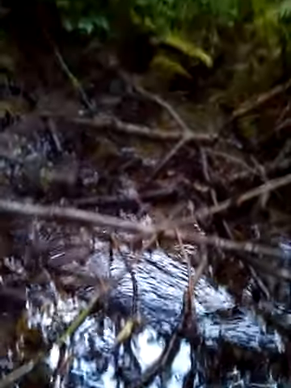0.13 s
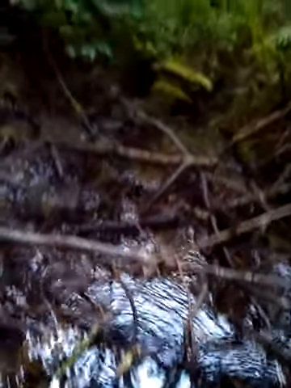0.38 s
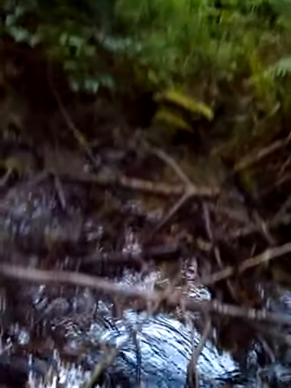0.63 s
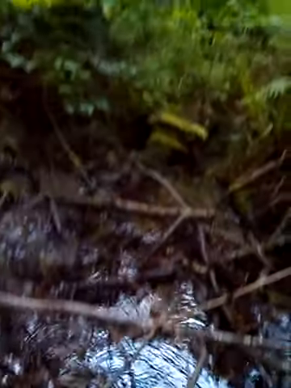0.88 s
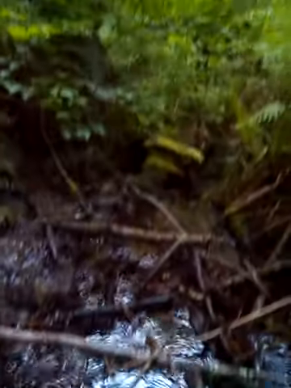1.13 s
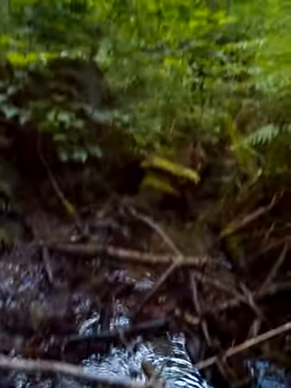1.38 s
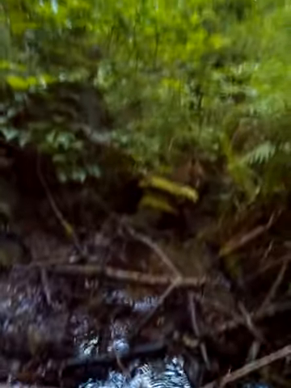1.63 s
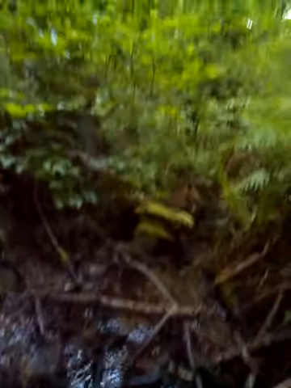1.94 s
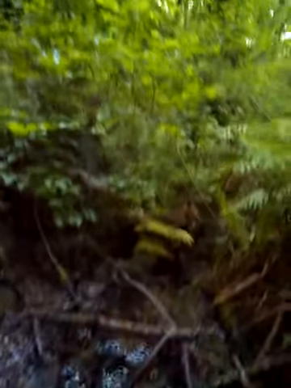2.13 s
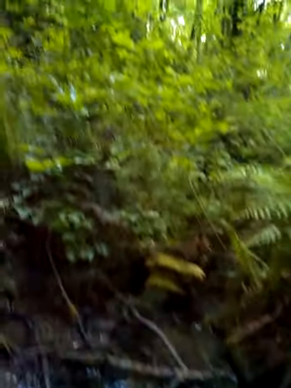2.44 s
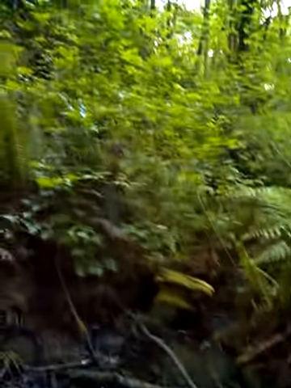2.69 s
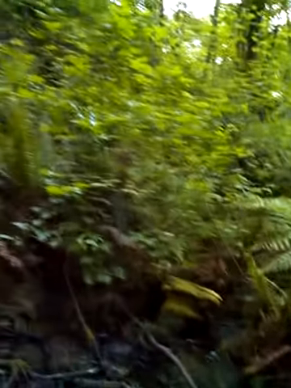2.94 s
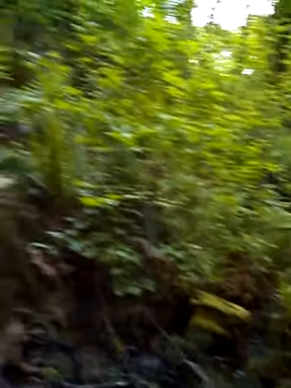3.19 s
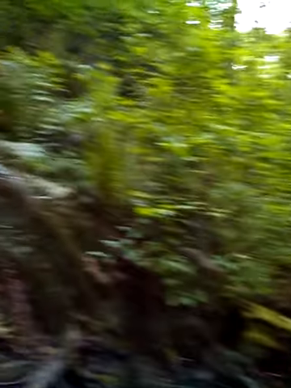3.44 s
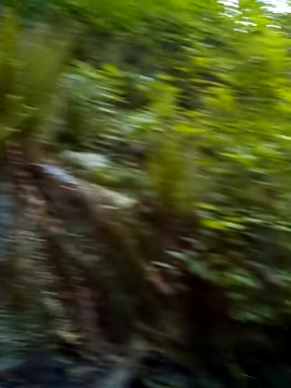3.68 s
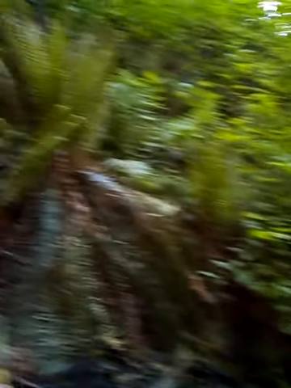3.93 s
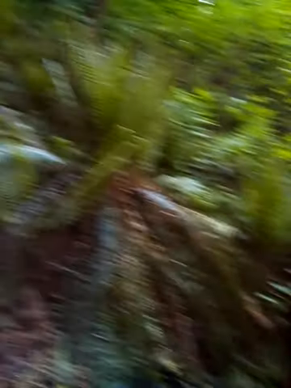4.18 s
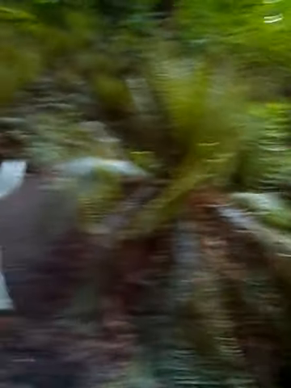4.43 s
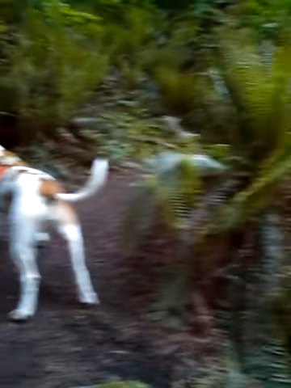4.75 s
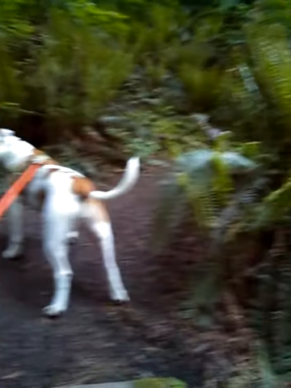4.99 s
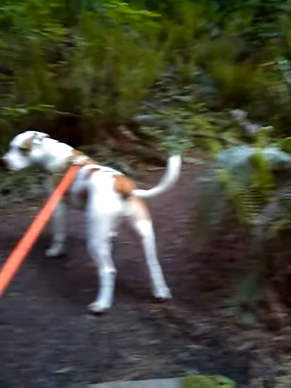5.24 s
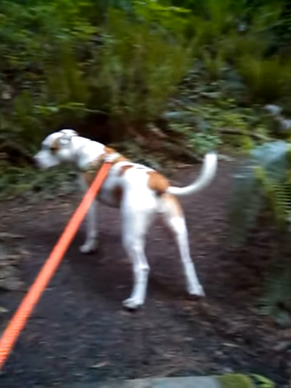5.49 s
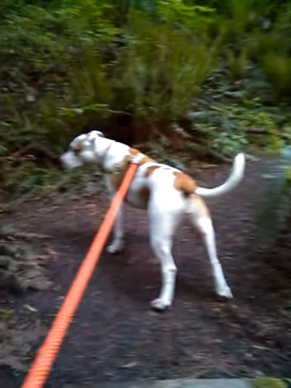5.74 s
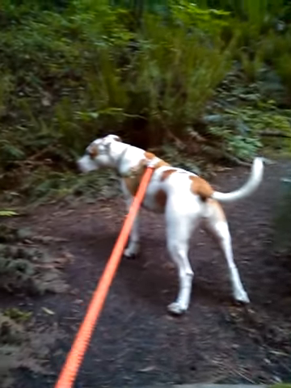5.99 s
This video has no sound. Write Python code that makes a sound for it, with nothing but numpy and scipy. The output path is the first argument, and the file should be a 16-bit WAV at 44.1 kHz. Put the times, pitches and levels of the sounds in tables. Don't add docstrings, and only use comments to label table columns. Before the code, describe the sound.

A small creek trickles brightly over stones with drops, bubbles and glugs, a heel knocks once on a wooden plank, then the water fades.

```python
import sys
import numpy as np
from scipy import signal
from scipy.io import wavfile
from scipy.ndimage import uniform_filter1d

SR = 44100
rng = np.random.default_rng(int(sys.argv[2]) if len(sys.argv) > 2 else 0)


def level_to_linear(level):
    exponent = np.asarray(level, float) / 20
    return 10 ** exponent


def master(y):
    cut = np.clip(np.atleast_2d(y).T, -1, 1)
    pcm = np.round(cut * 32767)
    wavfile.write(sys.argv[1], SR, pcm.astype(np.int16))


N = 269892

# time in seconds, level in dB, lead of the right capsule in samples.
NEARNESS = [
    (0.0, -43.5, 4),
    (0.85, -43.5, 4.9),
    (1.81, -43.5, 4.9),
    (2.25, -42.5, 1.7),
    (2.98, -43, 6.3),
    (3.54, -45, 5.7),
    (4.29, -47, 8.4),
    (5.25, -50.5, 2.9),
    (6.12, -55.5, 6.4),
]
# frequency in Hz, level in dB per Hz when the creek is close.
FIZZ_SPECTRUM = [(1500, -93.5), (2500, -79.5), (4000, -81), (6000, -81.5), (7600, -83), (9000, -89.5),
                 (10300, -100), (13500, -94), (16000, -99)]
# frequency in Hz, level in dB per Hz when the creek is close.
GURGLE_SPECTRUM = [(150, -75.5), (300, -79.5), (480, -70), (700, -81.5), (1000, -84), (1500, -79.5),
                   (2200, -83), (4000, -102.5)]
# frequency in Hz, level in dB per Hz.
FOREST_SPECTRUM = [(30, -57.5), (60, -77), (90, -71), (170, -73), (350, -75), (700, -82.5), (1500, -81.5),
                   (4000, -91.5), (9000, -104), (11000, -114)]
# frequency in Hz, change in dB.
CASE_SHADE = [(300, -2), (1200, -9), (2200, -3.5), (3400, -11), (6500, -5), (9000, -8.5), (14000, -15)]
# frequency in Hz, likeness from 0 to 1.
LIKENESS = [(90, 0.74), (170, 0.6), (450, 0.98), (1000, 0.74), (1800, 0.042), (4000, 0.033), (10000, 0.037)]
# start in seconds, peak in dB, pitch in Hz.
CLEAR_DROPS = [(0.0158, -29, 3780), (0.0303, -27.5, 4200), (0.1232, -28, 3660), (0.2429, -24, 3960),
               (0.3188, -27, 4580), (0.3246, -29, 3950), (0.5005, -34, 3400), (0.6732, -35, 4200),
               (0.7668, -26, 4250), (0.6852, -32, 4310), (0.7433, -28.5, 3720), (0.9236, -26, 4650),
               (0.994, -25.5, 4100), (1.3125, -30, 4390), (1.3847, -27.5, 4000), (1.4591, -28, 4220),
               (1.8128, -25.5, 4200), (1.8212, -26, 4340), (1.9442, -20.5, 5000), (2.1314, -25.5, 4240),
               (2.352, -32, 3920), (2.5225, -25.5, 5050), (2.5863, -26.5, 4250), (2.7311, -26, 3900),
               (3.029, -26.5, 4030), (3.0689, -25.5, 4030), (3.1534, -23, 4030), (2.857, -25, 4000),
               (3.8112, -30, 4070), (4.215, -34, 4000)]
# start in
# seconds, peak in dB, pitch in Hz.
SINGLE_BUBBLES = [(0.1068, -30, 2320), (0.1358, -32, 1880), (0.1591, -32, 1570), (0.3376, -29, 1015),
                  (0.3477, -29, 1480), (0.3753, -33.5, 1210), (0.5175, -32.5, 1360), (0.5857, -36, 1315),
                  (0.7715, -35, 1460), (0.9703, -35, 1330), (1.2185, -35, 1880), (1.3259, -33.5, 1315),
                  (1.9731, -30, 2200), (2.0457, -33, 1390), (2.1603, -35, 1480), (2.3577, -39, 1010),
                  (2.6523, -30, 2280), (2.7365, -31.5, 996), (2.7423, -30, 1610), (2.7815, -33, 900),
                  (2.9846, -31, 2230), (3.1167, -35, 1020), (3.7451, -36, 1210), (4.18, -38, 980),
                  (5.0425, -35.5, 1390), (1.0821, -35, 2550), (1.8277, -33, 2600), (2.3719, -28, 2570),
                  (3.2721, -38, 2650)]
# start in seconds, peak in dB, pitch in Hz.
HOLLOW_GLUGS = [(0.052, -34.5, 526), (0.329, -33, 466), (0.405, -28.5, 396), (0.451, -34, 433),
                (0.487, -32.5, 457), (0.519, -32.5, 603), (0.609, -34, 413), (0.662, -33.5, 460),
                (0.859, -35.5, 394), (1.415, -35, 425), (1.602, -29.5, 488), (1.638, -33, 510),
                (1.751, -32, 400), (1.954, -36, 540), (2.431, -34.5, 387), (2.638, -35.5, 500),
                (2.719, -29, 507), (2.76, -37, 443), (3.096, -34.5, 534), (3.355, -33, 405),
                (3.64, -31.5, 470), (3.69, -31.5, 494), (3.97, -30, 500), (4.526, -36, 500),
                (4.684, -32, 503), (4.821, -38, 383), (5.455, -37, 475), (5.836, -36, 596)]
# start in seconds, peak in dB.
SPRAY_TICKS = [(0.0293, -32), (0.2039, -38), (0.2473, -29), (0.2783, -40), (0.3571, -32), (0.4254, -34),
               (0.5126, -34), (0.6025, -29), (0.6784, -33), (0.7654, -29), (0.9058, -33), (0.9243, -31),
               (1.041, -26), (1.2121, -28), (1.313, -29), (1.4112, -36), (1.5918, -36), (1.6207, -30),
               (1.6995, -29.5), (1.9415, -25.5), (1.978, -28), (2.0313, -26.5), (2.0905, -33),
               (2.2972, -40), (2.9976, -30), (3.0886, -27)]
# start in seconds, splash peak in dB, drop peak in dB, drop pitch in Hz.
STONE_SPLASHES = [(0.247, -20, -25.5, 3830), (0.6627, -24.5, -20.5, 4400), (1.075, -26, -23.5, 4200),
                  (1.6006, -27, -28, 6200), (2.653, -38, -28, 5560), (2.9994, -32, -25, 5600),
                  (3.0897, -26, -30, 4240), (3.1028, -33, -39, 7100), (3.3477, -30, -28.5, 4330),
                  (3.737, -30, -25.5, 4330), (4.485, -29, -28, 4690), (4.682, -32, -46, 5870),
                  (4.795, -38, -27, 4030)]
# start in seconds, peak in dB, upper mode gain in dB, thud in dB, free ringing in seconds.
HEEL_BLOWS = [(1.8938, -14, 1, -7, 0.0137), (1.912, -22.5, 9.5, -13, 0.0027),
              (1.9201, -17, -13, -8.5, 0.0043), (1.9272, -27.5, 4, 5, 0.0076), (1.933, -33, 16, 0, 0.007),
              (1.944, -33, 13, -12, 0.0071), (1.954, -29, -3, -7, 0.013), (1.968, -35, 4, -4, 0.0092),
              (1.983, -47, 4, -6, 0.016), (2.001, -37, 4, -19, .015), (3.691, -35, -14, 12, 0.0088)]
# frequency in Hz, level in dB, time to fall 60 dB in seconds.
BOARD_MODES = [(460, -2.5, 0.053), (688, -7, 0.022), (1035, -9.5, 0.019), (1210, -19, 0.056),
               (2800, -29, 0.027)]
# frequency in Hz, level in dB.
HIDDEN_BELOW = [(700, -24), (1400, -16), (3000, -14), (8000, -14.5), (9300, -5.5), (16000, -3)]


def evened(x):
    return x / np.sqrt(np.mean(x ** 2) + 1e-20)


def read(points, hz):
    point_hz, value = np.transpose(points)
    return np.interp(np.log(hz + 1), np.log(point_hz + 1), value)


def fizz_level(t):
    s, db, _ = np.transpose(NEARNESS)
    return np.interp(t, s, db)


def gurgle_level(t):
    return 0.63 * fizz_level(t) - 16.5


def right_lead(t):
    s, _, lead = np.transpose(NEARNESS)
    return np.interp(t, s, lead)


def add(mix, s, sound, shade_db, lead):
    left_at = round(s * SR)
    right_at = max(round(s * SR - lead), 0)
    for side, at, db in ((0, left_at, 0.1), (1, right_at, shade_db)):
        part = mix[side, at:][:len(sound)]
        part += level_to_linear(db) * sound[:len(part)]


def ring(hz, t60, rise, cycles):
    t60 = np.clip(t60, 0.002, 0.3)
    t = np.arange(0, t60, 1 / SR)
    tone = np.sin(2 * np.pi * hz * (t + rise * t ** 2 / t60))
    start = 1 - np.exp(-t * hz / cycles)
    return tone * level_to_linear(-60 * t / t60) * start


def wash():
    frames, hop = N // 128 + 5, 128
    hz = np.fft.rfftfreq(512, 1 / SR)[:, None]
    t = np.arange(frames) * hop / SR
    a, b, c, d, patches = rng.standard_normal((frames, 257, 5)).T
    patches = uniform_filter1d(patches, size=7, axis=0)
    patches = evened(uniform_filter1d(patches, size=9, axis=1))
    flicker = evened(uniform_filter1d(rng.standard_normal(frames), size=7))
    fizz = level_to_linear(read(FIZZ_SPECTRUM, hz) + fizz_level(t) + 43.5 + 2.0 * patches + 1.76 * flicker)
    gurgle = level_to_linear(read(GURGLE_SPECTRUM, hz) + gurgle_level(t) + 43.5 + 4.26 * patches + 0.46 * flicker)
    hum = level_to_linear(read(FOREST_SPECTRUM, hz))
    size = np.sqrt(fizz ** 2 + gurgle ** 2 + hum ** 2)

    left, other = a + 1j * b, c + 1j * d
    same = np.clip(read(LIKENESS, hz), 0, 1)
    early = np.exp(2j * np.pi * hz * right_lead(t) / SR)
    right = same * left * early + np.sqrt(1 - same ** 2) * other
    right = right * level_to_linear(read(CASE_SHADE, hz))
    plain = signal.istft(left, nperseg=512, noverlap=384)[1]
    unit = np.sqrt(np.mean(plain ** 2) * 2 / SR)
    both = signal.istft(np.array([left, right]) * size, nperseg=512, noverlap=384)[1]
    return both[:, :N] / unit


def swarm(count, low_hz, high_hz, cycles, per_s, spread_db, db, level):
    out = np.zeros((2, N + SR))
    bursts = int(per_s / count * N / SR)
    for hz in np.geomspace(low_hz, high_hz, count):
        when, chance = rng.random((bursts, 2)).T
        size = level_to_linear(spread_db * np.minimum(-np.log(chance + 1e-9), 4))
        pop = ring(hz, cycles / hz, 0.092, 0.9)
        at = (when * N).astype(int)[:, None] + np.arange(len(pop))
        pops = np.bincount(at.ravel(), np.outer(size, pop).ravel(), N + SR)
        out[0] += pops
        out[1] += level_to_linear(read(CASE_SHADE, hz)) * np.roll(pops, -rng.integers(0, 14))
    return evened(out[:, :N]) * level_to_linear(db + level(np.arange(N) / SR))


def ringing_air(rows, gain_db, t60_at_1khz, rise, cycles):
    out = np.zeros((2, N))
    for s, peak_db, hz in rows:
        tone = ring(hz, t60_at_1khz * (1000 / hz) ** 0.61, rise, cycles)
        add(out, s, level_to_linear(peak_db + gain_db) * tone, read(CASE_SHADE, hz), right_lead(s))
    return out


def drops():
    after_splash = [(s + 0.0008, db, hz) for s, _, db, hz in STONE_SPLASHES]
    return ringing_air(list(CLEAR_DROPS) + after_splash, 7.6, t60_at_1khz=0.021, rise=0.033, cycles=1.05)


def bubbles():
    return ringing_air(SINGLE_BUBBLES, 3.8, t60_at_1khz=0.042, rise=0.21, cycles=1.2)


def glugs():
    return ringing_air(HOLLOW_GLUGS, 2.1, t60_at_1khz=0.036, rise=0.032, cycles=0.35)


def spray_ticks():
    out = np.zeros((2, N))
    t = np.arange(800) / SR
    start = 1 - np.exp(-t / 0.00037)
    for s, peak_db in SPRAY_TICKS:
        bright = np.diff(rng.standard_normal(802), 2)
        add(out, s, level_to_linear(peak_db - 14.0 - 60 * t / 0.02) * start * bright, -3, right_lead(s))
    return out


def stone_splashes():
    out = np.zeros((2, N))
    fade = level_to_linear(-60 * np.arange(800) / SR / 0.013)
    band = signal.butter(3, [2600, 7300], "band", fs=SR)
    for s, peak_db, *_ in STONE_SPLASHES:
        burst = signal.lfilter(*band, rng.standard_normal(800) * fade)
        add(out, s, level_to_linear(peak_db + 6.0) * burst, -6.5, right_lead(s))
    return out


def plank_knocks():
    out = np.zeros((2, N))
    for s, peak_db, upper_db, thud_db, free_s in HEEL_BLOWS:
        for hz, db, t60 in BOARD_MODES:
            mode = ring(hz, 1.04 * t60, 0, 0.59)
            sole_db = -4500 * np.maximum(np.arange(len(mode)) / SR - free_s, 0)
            mode_db = peak_db + db + upper_db * (900 < hz < 2000)
            add(out, s, level_to_linear(mode_db + sole_db) * mode, 0.3, 7)
        thud = ring(245, 0.013, 0, 0.33)
        add(out, s, level_to_linear(peak_db + thud_db + 6.0) * thud, 0.3, 7)
    return out


def plank_shiver():
    out = np.zeros((2, N))
    t60, taps_per_s = 0.93, 500
    t = np.arange(0, t60, 1 / SR)
    hit = rng.random(len(t)) < taps_per_s / SR
    chatter = rng.standard_normal(len(t)) * hit * level_to_linear(-27 - 60 * t / t60)
    for hz in (800, 1250, 1600):
        flipped = chatter * rng.choice([-1, 1], len(t))
        add(out, 1.93, np.convolve(flipped, ring(hz, 0.01, 0, 0.54)) / 3, -1, 7)
    return out


def bank(x):
    t = np.arange(4000) / SR
    taps = rng.standard_normal((2, 4000)) * (rng.random((2, 4000)) < 0.05)
    taps = taps * level_to_linear(-60 * t / 0.026) * (t > 0.003)
    return signal.oaconvolve(x, taps / np.linalg.norm(taps[0]), axes=1)[:, :N]


def scene():
    close = swarm(count=16, low_hz=2300, high_hz=5100, cycles=42, per_s=90, spread_db=1.5, db=-8,
                  level=fizz_level)
    close += swarm(count=8, low_hz=900, high_hz=2000, cycles=40, per_s=56, spread_db=1.5, db=-11,
                   level=gurgle_level)
    close += swarm(count=30, low_hz=2500, high_hz=7000, cycles=38, per_s=600, spread_db=4, db=-6,
                   level=fizz_level)
    close += swarm(count=8, low_hz=2300, high_hz=6850, cycles=2.83, per_s=200, spread_db=4.5, db=-10,
                   level=fizz_level)
    close += swarm(count=12, low_hz=380.5, high_hz=2097, cycles=24, per_s=150, spread_db=-1.0, db=-8,
                   level=gurgle_level)
    close += drops() + bubbles() + glugs() + spray_ticks() + stone_splashes()
    close += plank_knocks() + plank_shiver()
    return wash() + close + level_to_linear(-8.5) * bank(close)


def widen(x):
    delay = 16
    late = np.pad(x[::-1], ((0, 0), (delay, 0)))[:, :N]
    return (x - 0.93 * late) * level_to_linear(np.array([[-0.85], [0.85]]))


def thin(x):
    hz, _, z = signal.stft(np.array([x[0] + x[1], x[0] - x[1]]) / 2, SR, nperseg=2048)
    power = uniform_filter1d(abs(z) ** 2, size=11, axis=1)
    both = uniform_filter1d(power.sum(0), size=25, axis=0)
    wander_db = 5 * np.repeat(rng.standard_normal((2, 65, z.shape[2])), 16, axis=1)[:, :len(hz)]
    treble = both[hz > 9000].sum(0)
    usual = uniform_filter1d(treble, size=15)
    low = (hz < 9000)[:, None]
    calm = (treble < 1.45 * usual) | (low & (treble < 2 * usual))
    limit = both * level_to_linear(2 * read(HIDDEN_BELOW, hz)[:, None] + wander_db)
    hidden = (power < limit) & calm
    mid, side = signal.istft(z * ~hidden, SR, nperseg=2048)[1][:, :N]
    return np.array([mid + side, mid - side])


def top_cut(x):
    return signal.sosfilt(signal.butter(12, 15760, fs=SR, output="sos"), x)


def record(dry):
    low_cut = signal.butter(4, 48, "high", fs=SR, output="sos")
    heard = signal.sosfilt(low_cut, dry)
    high_cut = signal.firwin(511, 15490, fs=SR)
    heard = signal.oaconvolve(heard, high_cut[None], "same")
    return top_cut(thin(widen(heard)))


dry = scene()
out = record(dry)
master(out)
```